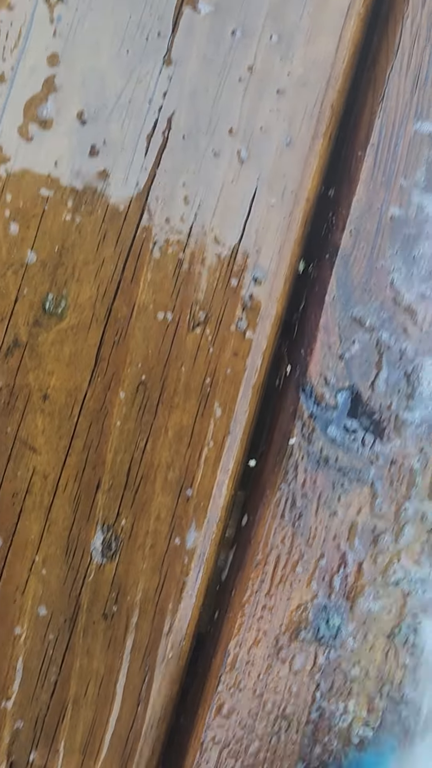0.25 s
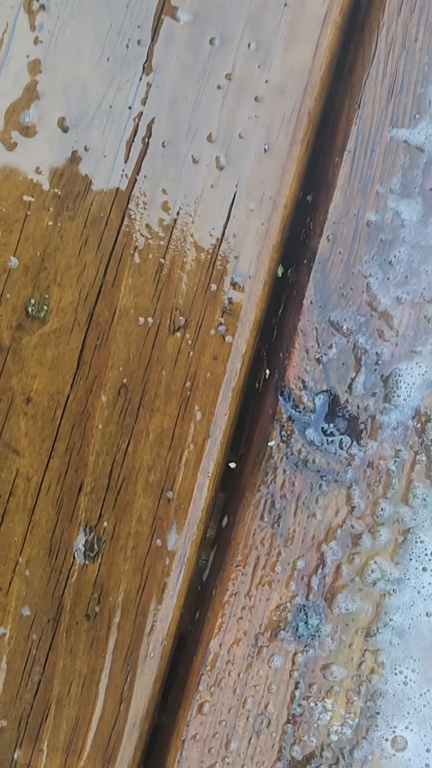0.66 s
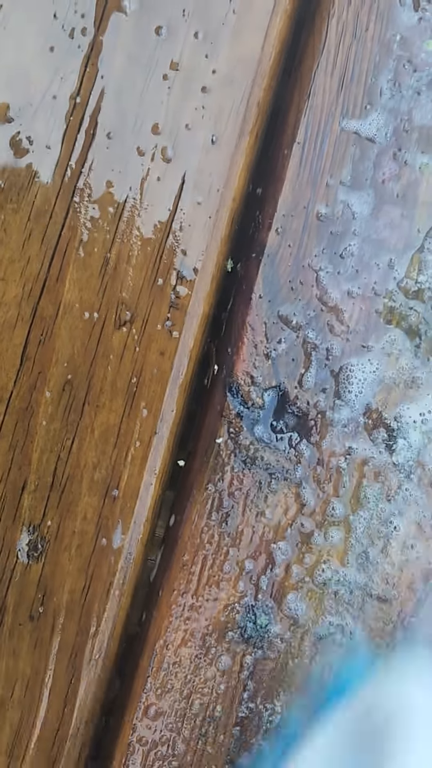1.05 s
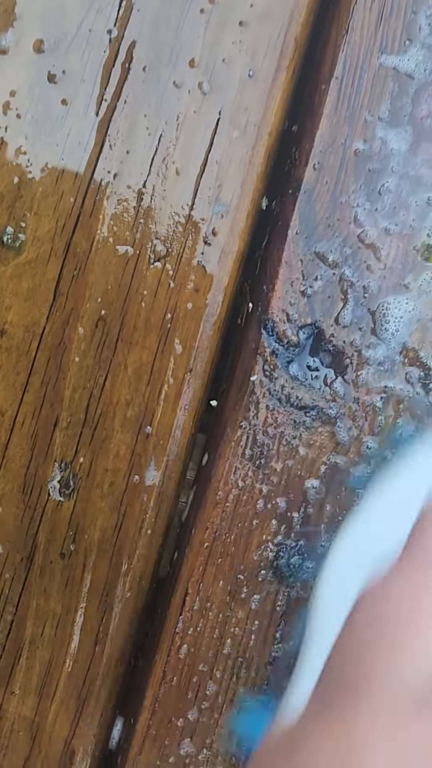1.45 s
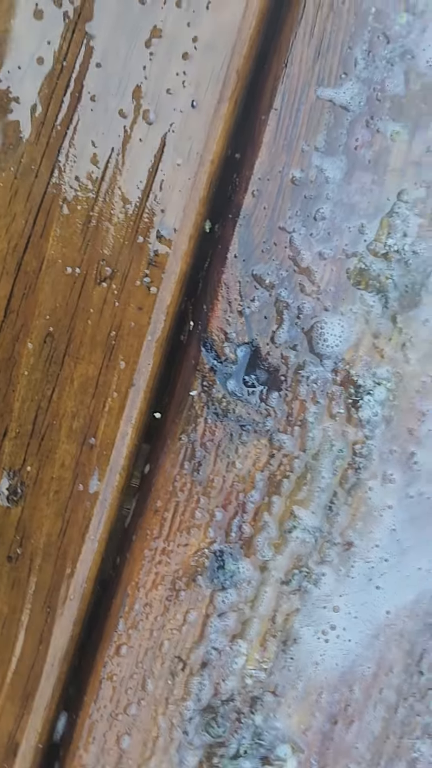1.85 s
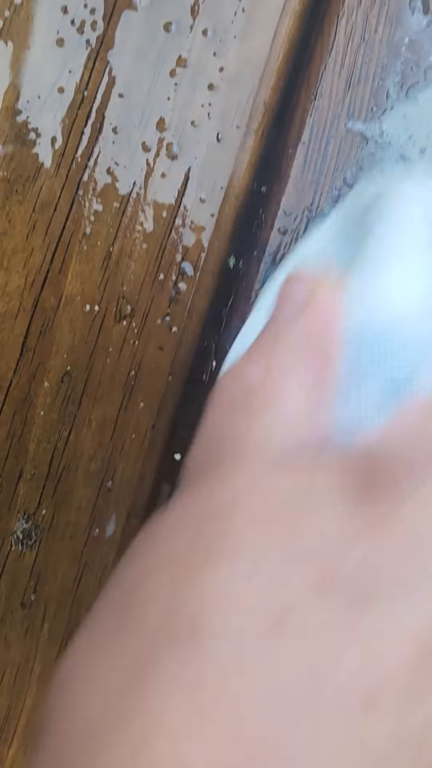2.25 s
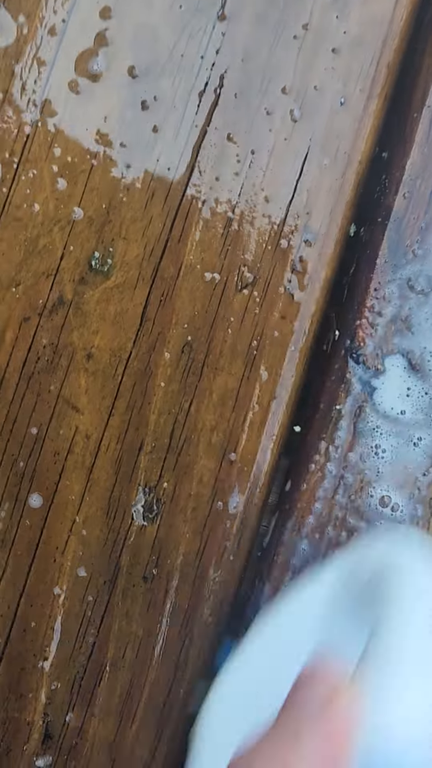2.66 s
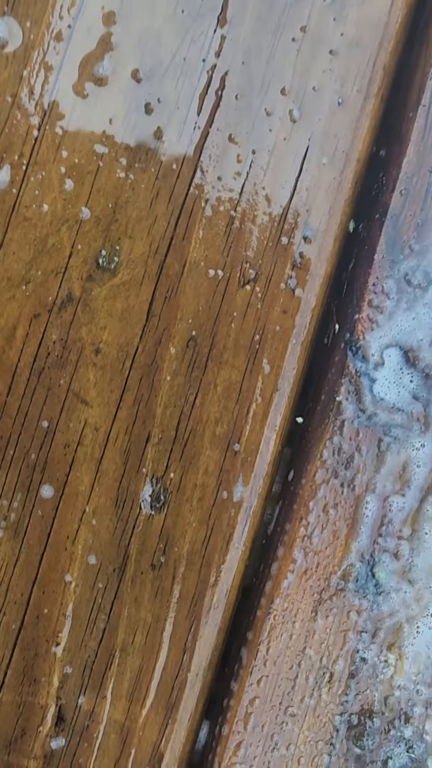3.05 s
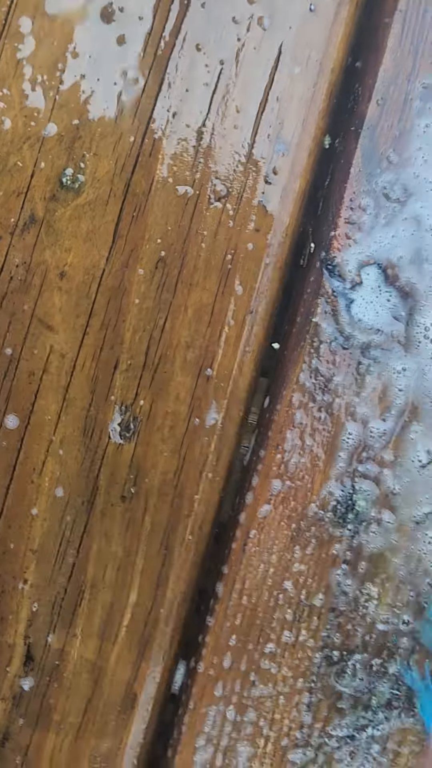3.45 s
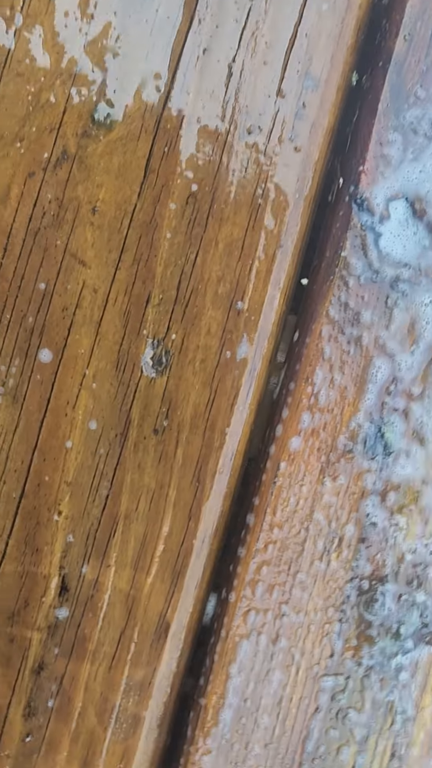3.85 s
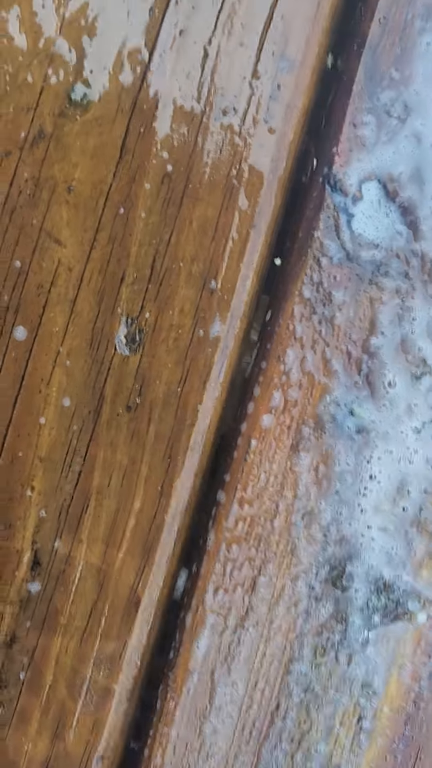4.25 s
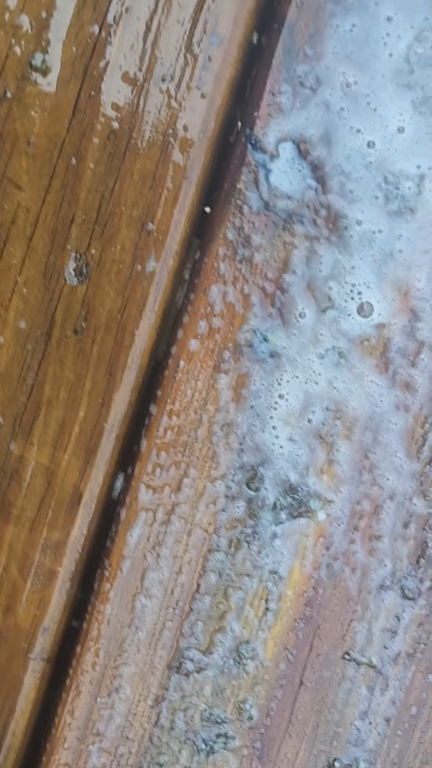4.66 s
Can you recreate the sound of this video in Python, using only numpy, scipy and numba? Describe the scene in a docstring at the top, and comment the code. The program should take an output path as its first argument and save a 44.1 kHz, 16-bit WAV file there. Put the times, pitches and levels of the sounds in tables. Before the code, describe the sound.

Outdoors on a wooden deck, microphones close to the boards. A wet brush rasps back and forth evenly, its swish gliding up on the push and down on the pull. Less than half a second in, a rapid run of hollow knocks and cracks shakes the wood. Scrubbing continues with small catches and squeaks, then stops; bubbles tick softly over quiet air and a throbbing insect buzz.

```python
"""On a garden deck a stiff hand brush scrubs wet, soapy boards back and forth, close to two microphone ports.
Bristles chatter, scratch and fizz through foam: random slips through resonances and filters, under stroke envelopes.
Some tufts snap free with a decaying squeak; the board drones below as resonances driven by the drag.
Early on a clattering bump shakes the deck: knocks, cracks and ringing modes. A few bubbles burst at the end.
Outdoor air and a throbbing insect buzz, both shaped noise, lie behind."""
import sys
import numpy as np
from scipy import signal
from scipy.fft import rfft, irfft, next_fast_len
from scipy.io import wavfile
from scipy.ndimage import uniform_filter1d
from numba import njit

SR = 44100
rng = np.random.default_rng(int(sys.argv[2]) if len(sys.argv) > 2 else 0)


def store_wav(level_fs):
    """Save 16-bit WAV to argv[1]."""
    pcm = np.round(np.clip(np.atleast_2d(level_fs), -1, 1) * 32767)
    wavfile.write(sys.argv[1], SR, pcm.T.astype(np.int16))


N = 216001
T = np.arange(N) / SR
LEFT_RIGHT = np.array([[1], [-1]])
LIFT_S = 4.45  # the brush leaves the boards

# Resonances of the bristle tips, before any shift. Each row: centre in Hz, width in Hz, level in dB.
TIP_MODES = [(3586, 2520, 0.5), (5173, 2140, -1), (7370, 2000, -13.5)]
# A tuft snaps free with a short squeak. Each row: start in seconds, level in dB, pitch in Hz.
TUFT_SNAPS = [(1.661, -13.5, 1750), (2.286, -12.5, 1870), (2.339, -6.5, 2100), (2.882, -15, 1980),
              (4.023, -10, 2148), (4.188, -18, 1710), (4.269, -10, 1995)]


def undb(db):
    """Decibels to gain."""
    return 10 ** (np.asarray(db) / 20)


def unit(x):
    """Scale so that the middle of the stereo pair has rms 1."""
    return x / np.std(np.atleast_2d(x).mean(axis=0))


def colour(x, points):
    """Minimum-phase filter with the given (Hz, dB) outline, built by folding its cepstrum."""
    hz, db = np.transpose(points)
    size = 2 * next_fast_len(N // 2 + 1)
    bins = np.maximum(np.fft.rfftfreq(size, 1 / SR), 1)
    outline_db = np.interp(np.log(bins), np.log(hz), db)
    cepstrum = irfft(np.log(undb(outline_db)), size)
    cepstrum[1:size // 2] *= 2
    cepstrum[size // 2:] = 0
    response = np.exp(rfft(cepstrum))
    return irfft(rfft(x, size) * response, size)[..., :N]


@njit
def band(x, hz, width):
    """State-variable band-pass whose centre may move."""
    y, band_state, low_state = np.empty(len(x)), 0., 0.
    for i in range(len(x)):
        g, k = np.tan(np.pi * hz[i] / SR), width / hz[i]
        v = (band_state + g * (x[i] - low_state)) / (1 + g * (g + k))
        band_state = 2 * v - band_state
        low_state += 2 * g * v
        y[i] = k * v
    return y


def resonate(x, modes, stretch):
    """Both channels through doubled band-passes, all centres shifted by the factor stretch."""
    out = np.zeros((2, N))
    for channel, side in enumerate(x):
        for k, (hz, width, db) in enumerate(modes):
            centre = hz * stretch
            once = band(side, centre, float(width))
            # neighbouring resonances take opposite signs
            out[channel] += (-1) ** k * undb(db) * band(once, centre, float(width))
    return out


def walk(rate):
    """Smooth random drift with a spread of 1, from stepped noise averaged twice."""
    k = max(int(SR / rate), 2)
    steps = np.repeat(rng.standard_normal(N // k + 1), k)[:N]
    return unit(uniform_filter1d(uniform_filter1d(steps, k), k))


def flicks(rate, scatter_db, lag_ms, width_ms):
    """Random slips, rate a second; each has its own spot on the brush, so its own lag at the left port."""
    at = np.flatnonzero(rng.random(N) < rate / SR)
    sign, loudness, spot = rng.standard_normal((3, len(at)))
    size = np.sign(sign) * undb(scatter_db * np.clip(loudness, -2, 2)) / np.sqrt(rate[at])
    late = np.rint((lag_ms[at] + width_ms * spot) * SR / 1000).astype(int)
    left = np.bincount((at + late) % N, size, N)
    right = np.bincount(at, size, N)
    return np.array([left, right])


def burst(start, t60):
    """Envelope of one contact: sudden start, exponential fall of 60 dB in t60 seconds."""
    return (T >= start) * undb(-60 * np.maximum(T - start, 0) / t60)


def pair(points):
    """Noise at the two ports with the given (Hz, dB) outline, alike in the bass."""
    mid, side = rng.standard_normal((2, N))
    side = colour(side, [(60, -16), (200, -12.0), (700, -1.5), (1300, 4.0), (2400, 1.0)])
    return unit(colour(mid + LEFT_RIGHT * side, points))


def reflect(x, reach):
    """Near surfaces add short echoes whose comb shifts as the hand travels."""
    # Echoes off the arm, the hand and the next board.
    # Each row: delay in ms when drawn back, delay in ms when pushed out, level in dB.
    echoes = [(1.9, 1.265, -32), (3.3, 4.1, -19), (6.4, 5.9, -17.5)]
    out = x
    for back_ms, out_ms, db in echoes:
        heard_at = T - (back_ms + (out_ms - back_ms) * reach) / 1000
        out = out + undb(db) * np.array([np.interp(heard_at, T, side) for side in x])
    return out


def garden():
    """Soft outdoor rumble and a fast-throbbing insect buzz, both drifting in level."""
    # Tone of the open air. Each row: frequency in Hz, level in dB.
    air_tone = [(20, -1), (38, 1), (55, 0.5), (75, 6), (120, -4), (200, -11.5), (350, -14), (600, -17.5),
                (1500, -30), (2300, -30.5), (5000, -26), (9500, -39), (13000, -40.5), (16000, -46)]
    # Tone of the insects. Each row: frequency in Hz, level in dB.
    insect_tone = [(5200, -32), (5900, -11), (6300, 2.5), (7100, -2.5), (7800, 0.5), (8300, -10),
                   (9200, -28)]
    air = pair(air_tone) * undb(-48.5 + 1.5 * walk(4.3))
    throb_hz = 55 + 4 * walk(17)
    throb = np.sin(2 * np.pi * np.cumsum(throb_hz) / SR)
    insects = pair(insect_tone) * undb(-52.0 + 1.1 * throb + .6 * walk(1.8))
    return air + insects


def suds():
    """A few bubbles burst once the brush is lifted: short decaying puffs of shaped noise."""
    # Bursting bubbles. Each row: start in seconds, relative level in dB.
    pops = [(4.674, -42), (4.7887, -37.5), (4.7964, -35.5), (4.8494, -44)]
    # Tone of a burst. Each row: frequency in Hz, level in dB.
    pop_tone = [(800, -10), (2200, 0.5), (3200, -8), (5000, -5.5), (9000, -16.5), (13000, -8), (16000, -18)]
    envelope = sum(undb(db) * burst(s, t60=0.033) for s, db in pops)
    return undb(-10.5) * pair(pop_tone) * envelope


def rumble():
    """The deck rumbles unevenly under the rocking body until the brush is lifted."""
    # Tone of the rumble. Each row: frequency in Hz, level in dB.
    rumble_tone = [(20, -7), (38, -4), (80, 3), (130, -7.5), (200, -9), (380, -7.5), (600, -21),
                   (1500, -27), (4000, -37), (16000, -57.5)]
    working = np.clip((LIFT_S - T) / 0.029 + 1, 0, 1)
    return pair(rumble_tone) * working * undb(-48.5 + 2.5 * walk(9.1))


def bump():
    """A quick run of blows: each knocks, cracks and sets the deck's decaying modes ringing."""
    # Blows of the bump. Each row: start in seconds, relative level in dB, crack in dB against that level.
    blows = [(0.38, 2.5, -4), (0.391, 1.5, -20), (0.405, -1, -21), (0.42, -2, 1), (0.43, 1, -6),
             (0.443, -13, -15), (0.453, -3.5, -8), (0.476, -5, 1.5), (0.494, -8, -4), (0.503, -15, -11)]
    # What the struck deck rings with. Each row: frequency in Hz, level in dB, time to fall 60 dB in seconds.
    deck_modes = [(40, -5.5, 0.48), (84, -9.5, 0.076), (110, -15.5, 0.3), (157, -13.5, 0.25),
                  (222.4, -11, 0.25), (254, -2.5, 0.25), (314.6, -0.5, 0.21), (354, -3, 0.087),
                  (424, -1.5, 0.13), (542, -12.5, .11), (630, -33, 0.15), (756, -21, 0.17),
                  (850, -5.5, .13), (850, -20, 0.24), (975, -17, 0.22), (1441, 4, 0.088), (1774, -16, 0.11),
                  (1920, -12, 0.083), (2250, -6.5, 0.054)]
    # Tone of each dry knock. Each row: frequency in Hz, level in dB.
    knock_tone = [(100, 7), (400, 0.5), (900, 3), (1300, -8.5), (1750, 0), (2300, -11.5), (3000, -20),
                  (6000, -38), (14000, -50)]
    push, knock, crack = np.zeros((1, N)), np.zeros(N), np.zeros(N)
    for s, db, crack_db in blows:
        push[0, int(s * SR)] += undb(db)
        knock += undb(db) * burst(s, t60=0.071)
        crack += undb(db + crack_db) * burst(s, t60=0.02)
    age = np.maximum(T[:SR] - np.array([[.4], [0]]) / 1000, 0)  # the left port is further off
    modes = np.zeros((2, SR))
    for k, (hz, db, t60) in enumerate(deck_modes):
        # neighbouring modes start in opposite directions
        modes += (-1) ** k * undb(db - 60 * age / t60) * np.sin(2 * np.pi * hz * age)
    ring = signal.fftconvolve(push, modes)[:, :N]
    cracks = unit(resonate(rng.standard_normal((2, N)), TIP_MODES, np.ones(N))) * crack
    return undb(-15.5) * ring + undb(-15.5) * pair(knock_tone) * knock + undb(-16.0) * cracks


def board(chatter_db, scratch_db, reach, speed, lag_ms):
    """The board drones under the whole friction force; its resonances shift as the load travels along it."""
    # Resonances of the loaded board, before the shift. Each row: centre in Hz, width in Hz, level in dB.
    board_modes = [(40.8, 5.3, 10.5), (79.5, 35, -3), (167.3, 40, -20), (239.7, 36, 1), (310, 20.6, -1.5),
                   (388.5, 68.4, 7), (674, 184, -3.5)]
    # Drone level before force and reach act on it. Each row: time in seconds, level in dB.
    drone_levels = [(0, -23.5), (1.8, -25.5), (3.0, -25), (4.1, -28), (4.35, -24.5)]
    force = np.hypot(undb(chatter_db), undb(scratch_db))
    # the heavy board follows the force sluggishly, so it keeps sounding through the turns
    force_db = 20 * np.log10(uniform_filter1d(force, SR // 14) + 1e-9)
    drag = reflect(flicks(400 + 900 * speed, scatter_db=2.0, lag_ms=lag_ms, width_ms=0.14), reach)
    drone_db = np.interp(T, *np.transpose(drone_levels))
    drone_db = drone_db + 6 * (reach - .5)  # fuller as the arm leans out over it
    droning = unit(resonate(drag, board_modes, 1.04 - 0.087 * reach))
    return droning * undb(0.6 * force_db + drone_db + 1.63 * walk(18))


def snaps():
    """Each freed tuft whips for a few cycles: a sine that swells and dies, a little later at the left port."""
    ports = T - np.array([[.06], [0]]) / 1000
    out = np.zeros((2, N))
    for s, db, hz in TUFT_SNAPS:
        age = np.maximum(ports - s, 0)
        swell = age / 0.00091  # peaks after 0.91 ms
        out += undb(db) * swell * np.exp(1 - swell) * np.sin(2 * np.pi * hz * age)
    return out


def swish(chatter_db, scratch_db, reach, speed, lag_ms):
    """A narrow swish glides up as the bristles straighten on the push, and down again on the pull."""
    mid_hz, rise_octaves = 2733, 2.3  # pitch at mid reach, rise over the whole reach
    slips = reflect(flicks(700 + 1500 * speed, scatter_db=1.0, lag_ms=lag_ms, width_ms=.06), reach)
    voice = unit(resonate(slips, [(mid_hz, 1100, 0)], 2 ** (rise_octaves * (reach - .5))))
    friction = np.hypot(undb(chatter_db), undb(scratch_db))
    return voice * undb(-9.5) * friction


def motion():
    """Reach and speed (0-1) of the hand: it swings like a pendulum from turn to turn."""
    # The brush turns round. Each row: time in seconds, reach from 0 (drawn back) to 1 (pushed out).
    turns = [(-0.12, 0.74), (0.17, 0.16), (0.42, 0.75), (0.62, 0.6), (0.95, 0.23), (1.27, 0.65),
             (1.59, 0.33), (1.92, 0.67), (2.22, 0.071), (2.545, 0.76), (2.81, 0.28), (3.14, 0.85),
             (3.45, 0.2), (3.8, 0.87), (4.13, 0.19), (4.48, 1.0)]
    s, reach = np.transpose(turns)
    swing = np.interp(T, s, np.arange(len(s)))
    eased = np.floor(swing) + (1 - np.cos(np.pi * (swing % 1))) / 2
    return np.interp(eased, np.arange(len(s)), reach), np.abs(np.sin(np.pi * swing))


def strokes(reach):
    """Levels (dB) of chatter, scratch and fizz: strokes swell, hold and fade; the bristles' lean sets the balance."""
    # Strokes, pull and push in turn. Each row: start, end, swell and fade in seconds,
    # then relative levels of bristle chatter, tip scratch and foam fizz in dB.
    stroke_rows = [(-0.1, 0.162, 0.09, 0.072, -24.5, -18, -26),
                   (0.196, 0.512, 0.062, 0.21, -22, -19.5, -26),
                   (0.653, 0.954, 0.084, 0.083, -28.5, -24, -28),
                   (0.97, 1.272, 0.12, 0.078, -21.5, -19.5, -26.5),
                   (1.274, 1.577, 0.1, 0.093, -21.5, -18.5, -28.5),
                   (1.593, 1.916, 0.12, 0.069, -20, -20.5, -29), (1.922, 2.209, 0.12, 0.11, -23, -17, -26),
                   (2.238, 2.544, 0.097, 0.083, -20.5, -20.5, -29),
                   (2.549, 2.797, 0.096, 0.045, -23.5, -22.5, -30),
                   (2.855, 3.131, 0.043, 0.054, -21.5, -21, -28),
                   (3.155, 3.449, 0.11, 0.12, -18, -16.0, -24.5),
                   (3.463, 3.802, 0.091, 0.069, -22, -19.5, -26),
                   (3.794, 4.107, 0.15, 0.073, -17.5, -18, -27.5),
                   (4.147, 4.463, 0.083, 0.061, -17.5, -19, -27.5)]
    # Drawn back, the bristles lie bent and chatter; pushed out, they stand and scratch up foam.
    # Each row: reach from 0 to 1, then chatter, scratch and fizz gain in dB.
    lean_rows = [(0, 8.5, -12.5, -4.5), (.25, -2.5, -6.5, -7), (.5, -1, -1, -0.5), (.75, -8, 1, 1),
                 (1, -15, -8, -.5)]
    touch_db = -34.5  # level at the very start and end of a stroke, against its full level
    ease_power = 2.024  # swell and fade are steepest next to the turn
    creep_db, creep_s = -30, 0.34  # wet bristles keep stirring faintly through a turn
    pressed = np.full((3, N), -120.)
    for start, end, swell, fade, *layers_db in stroke_rows:
        before_full = np.maximum(1 - (T - start) / swell, 0) ** ease_power
        after_full = np.maximum(1 - (end - T) / fade, 0) ** ease_power
        stroke_db = np.array(layers_db)[:, None] + touch_db * (before_full + after_full)
        pressed = np.maximum(pressed, stroke_db)
    at_reach, *lean_db = np.transpose(lean_rows)
    gain = undb(pressed + np.array([np.interp(reach, at_reach, db) for db in lean_db]))
    average = np.abs(uniform_filter1d(gain, int(creep_s * SR), axis=1))
    creep = undb(creep_db) * average * (T < LIFT_S)
    return 20 * np.log10(np.hypot(gain, creep))


def brush():
    """Tufts stick and slip, tips scratch, foam fizzes; a faster brush gives denser grains."""
    # Resonances of the bent tufts, before the shift. Each row: centre in Hz, width in Hz, level in dB.
    tuft_modes = [(1144, 1010, -4), (1578, 394, 6.5), (2143, 560, 4.5)]
    # Tone of the foam. Each row: frequency in Hz, level in dB.
    foam_tone = [(3000, -9.5), (6000, 1.5), (8500, -2), (10500, 0), (12800, 6), (14500, -0.5), (16000, -7)]
    # Short swells of the scratch within a stroke. Each row: centre in seconds, extra level in dB.
    surges = [(.05, 4.5), (.8, 4), (1.18, 3.5), (1.41, 2), (2.63, 0), (2.73, 4.5), (3.055, 2.5),
              (3.245, 1.5), (4.3, 2), (4.39, 1)]
    # The bristles flip over and catch the wood after a turn. Each row: start in seconds, relative level in dB.
    catches = [(0.177, -45), (0.999, -39), (1.3, -37.5), (1.658, -38), (1.948, -36.5), (2.253, -47),
               (2.561, -34.5), (2.593, -32), (3.161, -34.5), (3.483, -46), (3.834, -29)]
    reach, speed = motion()
    chatter_db, scratch_db, fizz_db = strokes(reach)
    # 0 = bristles bent over and chattering, 1 = upright and scratching; upright ones ring higher
    upright = uniform_filter1d(.5 + .5 * np.tanh((scratch_db - chatter_db) / 8), SR // 40)
    # pushed out, the brush moves towards the right port
    lag_back_ms, lag_out_ms = -0.035, .33
    lag_ms = lag_back_ms + (lag_out_ms - lag_back_ms) * reach
    pan = LEFT_RIGHT * (.5 - reach) / 2

    tufts = reflect(flicks(600 + 1700 * speed, scatter_db=-1.0, lag_ms=lag_ms, width_ms=0.068), reach)
    tips = reflect(flicks(1300 + 4000 * speed, scatter_db=-0.5, lag_ms=lag_ms, width_ms=0.088), reach)
    foam = reflect(flicks(2000 + 6000 * speed, scatter_db=-3.0, lag_ms=lag_ms, width_ms=.15), reach)

    chattering = unit(resonate(tufts, tuft_modes, 0.973 + 0.17 * upright ** 2))
    # after a snap the neighbouring tufts chatter on, 12.5 dB below the snap's level
    rattle = sum(undb(db - 12.5) * burst(s, t60=0.162) for s, db, _ in TUFT_SNAPS)
    chatter = chattering * np.hypot(undb(chatter_db - 1.68 + 0.5 * walk(70)), rattle)

    scratching = unit(resonate(tips, TIP_MODES, 0.81 + 0.11 * upright + 0.18 * reach))
    surge_s = 0.022  # standard deviation of each bell-shaped swell
    surge_db = sum(db * np.exp(-((T - s) / surge_s) ** 2 / 2) for s, db in surges)
    scratch = scratching * undb(scratch_db + surge_db - 1.45 + 2 * pan + 0.87 * walk(90))

    fizzing = unit(colour(foam, foam_tone))
    fizz = fizzing * undb(fizz_db + 1.62 + 13.0 * pan)

    # the tips also rasp on the soaked wood itself, which never quite stops while they touch it
    rasping = unit(resonate(tips, [(1308, 1000, 0)], np.ones(N)))
    rasp = rasping * (undb(scratch_db - 13) + undb(-59) * (T < LIFT_S))

    catch_envelope = sum(undb(db) * burst(s, t60=.17) for s, db in catches)
    catch = (scratching + undb(1.5) * rasping + undb(-6.5) * fizzing) * catch_envelope

    glide = swish(chatter_db, scratch_db, reach, speed, lag_ms)
    drone = board(chatter_db, scratch_db, reach, speed, lag_ms)
    grain_db = 0.9 * walk(90)  # ridges of the wood catch many bristles at once
    return (chatter + scratch + glide + fizz + rasp + catch + drone) * undb(grain_db)


def scene():
    """Everything as it arrives at the two ports, background first."""
    return garden() + suds() + rumble() + bump() + snaps() + brush()


def record(dry):
    """Each port colours the treble its own way; the loudest peaks are rounded; the deepest bass and the top are cut."""
    # Colour of the two microphone ports. Each row: frequency in Hz, left level in dB, right level in dB.
    port_colours = [(196, -0.5, -1.4), (1310, 0, -1.5), (2440, 4.5, 4.5), (4240, -1, -1), (7440, 1.5, 5.5),
                    (8800, 3, -2.5), (10350, 4.5, -12.5), (12080, -4, 3), (16800, -4, 1)]
    hz, *sides_db = np.transpose(port_colours)
    heard = np.array([colour(side, np.column_stack([hz, db])) for side, db in zip(dry, sides_db)])
    heard = signal.sosfilt(signal.butter(4, 28, "high", fs=SR, output="sos"), heard)
    heard = heard / (1 + heard ** 6) ** (1 / 6)
    return signal.sosfilt(signal.ellip(10, .2, 80, 15800, fs=SR, output="sos"), heard)


dry = scene()
out = record(dry)
store_wav(out)
```